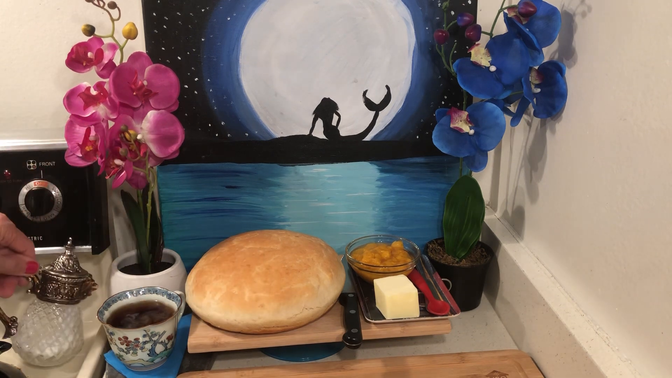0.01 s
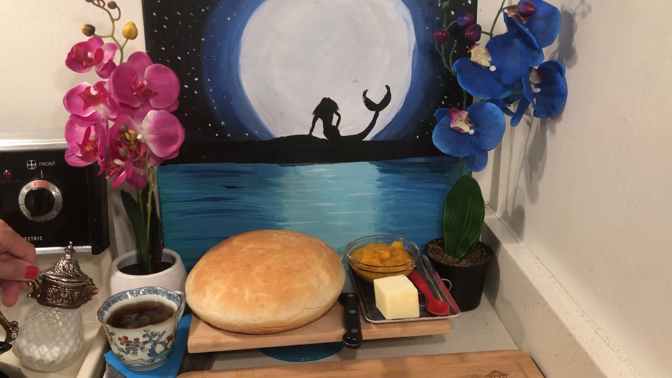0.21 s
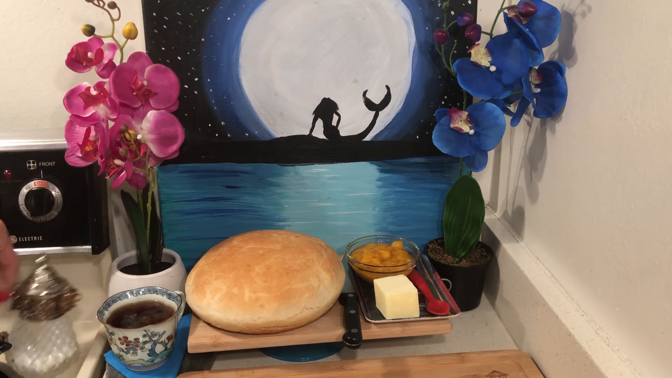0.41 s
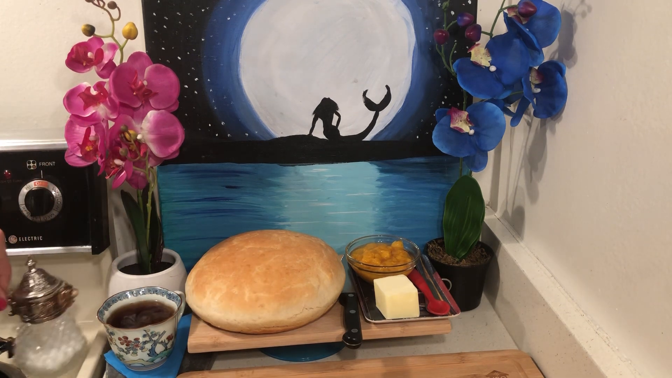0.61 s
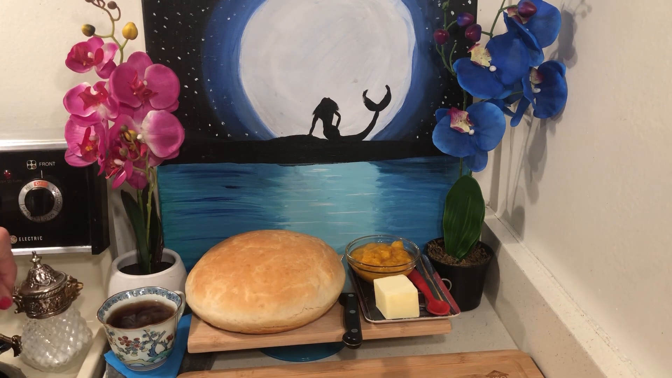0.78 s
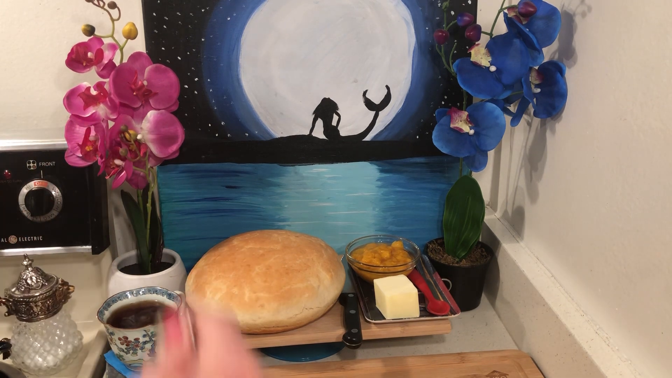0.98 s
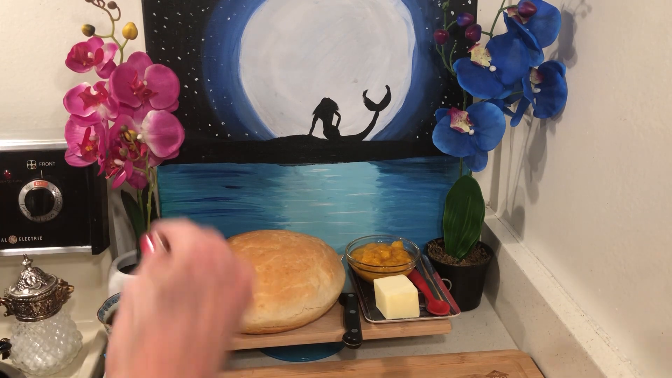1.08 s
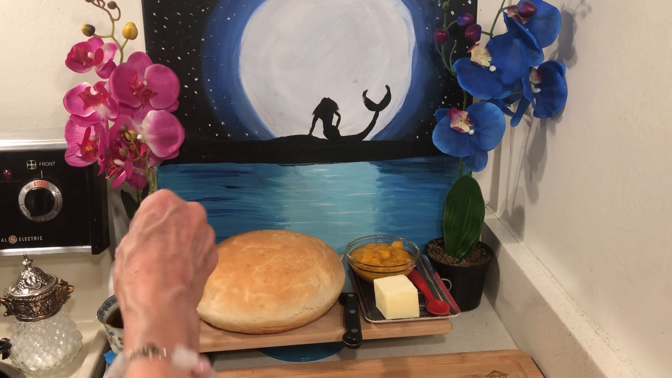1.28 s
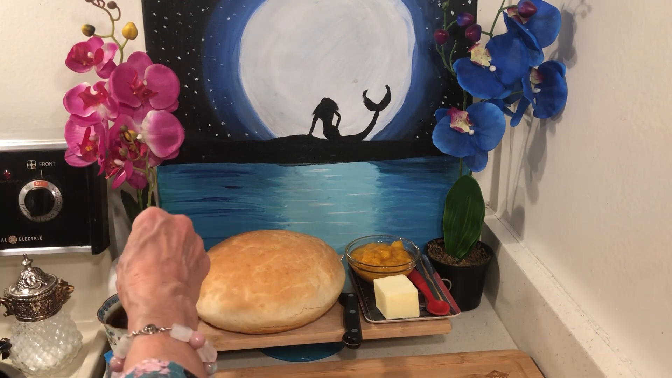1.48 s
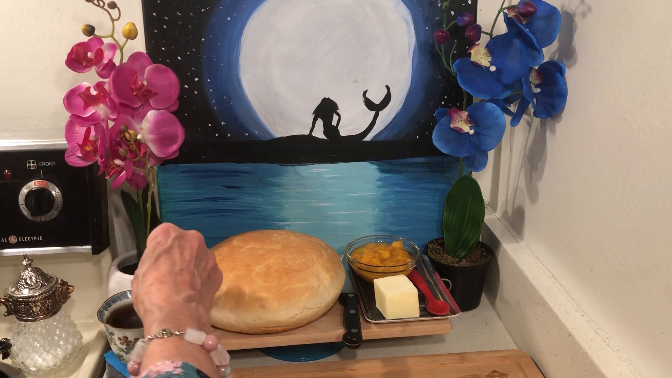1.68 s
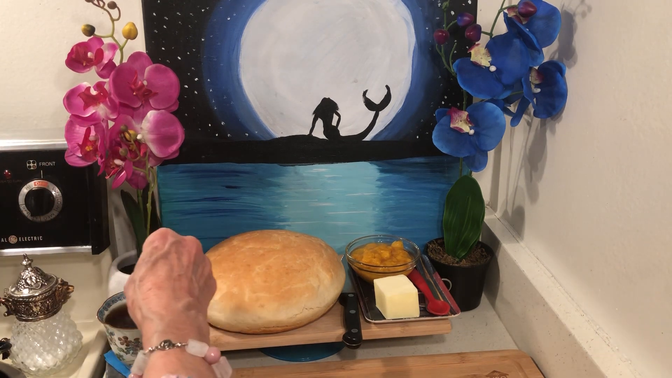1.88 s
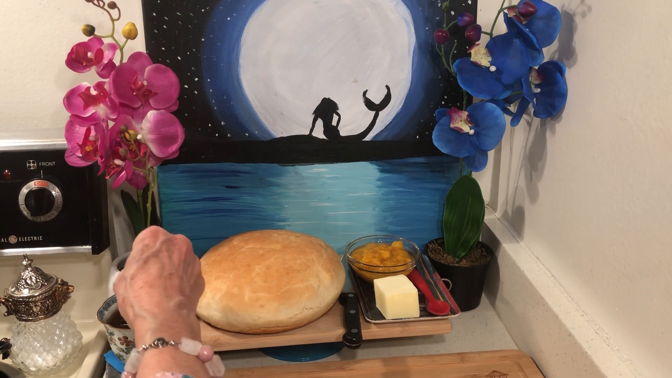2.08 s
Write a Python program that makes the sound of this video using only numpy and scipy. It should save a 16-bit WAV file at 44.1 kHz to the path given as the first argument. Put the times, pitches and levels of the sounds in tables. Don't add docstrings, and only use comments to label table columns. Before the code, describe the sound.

A small metal pot with a glass belly is set on a hard counter with sharp knocks, lid tink and rocking bounces, then a short drag; later a cup tap and faint bead jingle, close microphone, humming kitchen.

```python
import sys
import numpy as np
from scipy import signal
from scipy.io import wavfile
from scipy.ndimage import uniform_filter1d

SR = 44100
rng = np.random.default_rng(int(sys.argv[2]) if len(sys.argv) > 2 else 0)


def log_audio(samples):
    frames = np.atleast_2d(samples).T
    limited = np.clip(frames, -1, 1)
    pcm = np.round(limited * 32767).astype(np.int16)
    wavfile.write(sys.argv[1], SR, pcm)


def voltage_ratio(decibels):
    exponent = np.asarray(decibels, float) / 20
    return 10 ** exponent


N = 92610


def evened(x):
    return x / np.sqrt(np.mean(x ** 2) + 1e-20)


def read(points, hz):
    f, value = np.transpose(points)
    return np.interp(np.log(hz + 1), np.log(f + 1), value)


def add(mix, start_s, sound):
    part = mix[max(round(start_s * SR), 0):][:len(sound)]
    part += sound[:len(part)]


def causal(points, size=512):
    hz = np.abs(np.fft.fftfreq(4 * size, 1 / SR))
    log_gain = read(points, hz) * np.log(10) / 20
    spectrum = np.exp(np.conj(signal.hilbert(log_gain)))
    taps = np.fft.ifft(spectrum).real[:size]
    return taps / np.linalg.norm(taps)


def ring(modes, gains_db=0, paired=False, size=6000):
    t = np.arange(size) / SR
    hz, db, t60_s = np.transpose(modes)[:, :, None]
    wave = np.sin(2 * np.pi * hz * t)
    if paired:
        pair_split, partner_db = 0.0118, -8
        wave = wave + voltage_ratio(partner_db) * np.sin(2 * np.pi * hz * (1 + pair_split) * t)
    decay_db = -60 * t / np.clip(t60_s, 0.01, 0.45)
    return (voltage_ratio(db + gains_db + decay_db) * wave).sum(0)


# frequency in Hz, level in dB per Hz.
AIR_COLOUR = [(25, -15), (50, -26), (80, 0.5), (300, -8), (800, -12), (2500, -23), (7000, -34),
              (16000, -46)]
AIR_DB, AIR_EDGE_HZ, PATCHY_DB = -53.5, 15850, 1.0


def air():
    frames, hz = N // 1024 + 5, np.fft.rfftfreq(4096, 1 / SR)
    a, b, patches = rng.standard_normal((frames, 2049, 3)).T
    patches = uniform_filter1d(patches, size=30, axis=0)
    patches = evened(uniform_filter1d(patches, size=3, axis=1))
    level_db = read(AIR_COLOUR, hz)[:, None] + PATCHY_DB * patches
    z = (a + 1j * b) * voltage_ratio(level_db) * (hz < AIR_EDGE_HZ)[:, None]
    return voltage_ratio(AIR_DB) * evened(signal.istft(z, nperseg=4096, noverlap=3072)[1][:N])


# frequency in Hz, width in Hz, level in dB.
HUM_LINES = [(68, 21, -68), (122.2, 5.3, -55.5), (156.2, 13.5, -65.5), (229.2, 2.5, -57), (279.3, 6.5, -63),
             (413, 4, -62.5), (452, 18, -66.5)]


def hum():
    step_s = 0.005
    t, coarse_s = np.arange(N) / SR, np.arange(-1, N / SR + 0.1, step_s)
    out = np.zeros(N)
    for hz, width_hz, db in HUM_LINES:
        r = np.exp(-np.pi * width_hz * step_s)
        u, v = rng.standard_normal((2, len(coarse_s)))
        slow = signal.lfilter([1], [1, -2 * r, r * r], u + 1j * v)
        slow = np.interp(t, coarse_s, 1.3 + slow / np.abs(slow).mean())
        out += voltage_ratio(db) * evened((slow * np.exp(2j * np.pi * hz * t)).real)
    return out


# frequency in Hz, t60 in seconds.
ROOM_DECAY = [(100, 0.79), (400, 0.4), (1500, 0.33), (4000, 0.34), (9000, 0.26), (15000, 0.21)]
PREDELAY_S = 0.004
EARLY_GAIN, EARLY_S = 1.44, 0.022


def room(x):
    taps = np.zeros(SR // 3)
    at = np.arange(400, SR // 3 - 20, 20)
    at = at + rng.integers(0, 20, len(at))
    taps[at] = rng.choice([-1., 1.], len(at))
    hz, t, z = signal.stft(taps, SR, nperseg=256)
    z = z * voltage_ratio(-60 * t / read(ROOM_DECAY, hz)[:, None])
    tail = signal.istft(z, SR, nperseg=256)[1][400:]
    tail = tail * (1 + EARLY_GAIN * np.exp(-np.arange(len(tail)) / SR / EARLY_S))
    delay = np.zeros(round(PREDELAY_S * SR))
    return signal.oaconvolve(x, np.r_[delay, tail / np.linalg.norm(tail)])[:N]


# start in seconds, level in dB, pitch in Hz.
BOOM_EVENTS = [
    (0.211, -43, 87.4),
    (0.586, -50.5, 77.3),
    (0.76, -49, 109),
    (1.669, -60, 68.5),
]
BOOM_RISE_S, BOOM_T60_S = 0.07, 0.3


def booms():
    out, t = np.zeros(N), np.arange(SR // 2) / SR
    shape = (1 - np.exp(-t / BOOM_RISE_S)) ** 2 * voltage_ratio(-60 * t / BOOM_T60_S)
    shape = shape / shape.max()
    for start_s, db, hz in BOOM_EVENTS:
        tone = np.sin(2 * np.pi * hz * t) + 0.81 * np.sin(2 * np.pi * hz * 0.763 * t + 0.9)
        add(out, start_s, voltage_ratio(db) * tone * shape)
    return out


# frequency in Hz, level in dB, t60 in seconds.
BEAD_MODES = [(5835, -32, 0.13), (7420, -13, .025), (8450, -7, 0.036), (10000, -3, 0.055), (11400, -1, .02),
              (12450, -4, .035), (13700, -4, .035), (15400, -12, .015)]
BEAD_SCATTER_DB, BEAD_DETUNE, RATTLE_S = 2.0, 0.015, 0.0022


def jingle(db):
    scatter, detune = rng.standard_normal((2, len(BEAD_MODES), 1))
    pitch = 1 + BEAD_DETUNE * detune * (db < -56)
    modes = np.array(BEAD_MODES) * np.c_[pitch, np.ones((len(BEAD_MODES), 2))]
    rattle = rng.standard_normal(300) * np.exp(-np.arange(300) / SR / RATTLE_S)
    tone = ring(modes, BEAD_SCATTER_DB * scatter, paired=True, size=3000)
    return voltage_ratio(db) * signal.fftconvolve(tone, rattle / np.linalg.norm(rattle))


# start in seconds, level in dB.
JINGLE_EVENTS = [(1.76, -69), (1.833, -69), (1.8595, -68), (1.891, -67), (1.901, -70), (1.942, -62),
                 (1.9565, -46), (2.035, -74), (2.053, -67), (2.063, -73), (2.091, -65)]


def bracelet():
    out = np.zeros(N)
    for start_s, db in JINGLE_EVENTS:
        add(out, start_s, jingle(db))
    return out


CUP_MODE_HZ = [1416, 2950, 3346, 3353, 5211, 6030, 6821, 7413, 8250, 9900, 10300, 11500, 12400, 14560]
# level in dB, t60 in seconds.
CUP_MODES = [(-13.5, 0.45), (-5, .04), (-4.5, 0.15), (-3.5, 0.24), (-8, .28), (-10.5, 0.16), (-11.5, 0.1),
             (-7, 0.047), (-5.5, .12), (-2, 0.017), (-12, .08), (-6, 0.054), (-14, .05), (-13, .07)]
# start in seconds, level in dB.
CUP_EVENTS = [
    (1.718, -40.5),
    (1.946, -67.5),
]


def cup():
    out = np.zeros(N)
    for start_s, db in CUP_EVENTS:
        add(out, start_s, voltage_ratio(db) * ring(np.c_[CUP_MODE_HZ, CUP_MODES], paired=True, size=12000))
    return out


# frequency in Hz, level in dB, t60 in seconds.
LID_MODES = [(4470, -5.5, 0.041), (5890, -4, 0.13), (6170, -1, 0.085), (8170, -7, 0.13), (8300, -18, .05),
             (9400, -12, .08), (10800, -13, .06), (13200, -23, .05)]
# start in seconds, level in dB.
LID_EVENTS = [
    (0.085, -54),
    (0.204, -36),
]


def lid():
    out = np.zeros(N)
    for start_s, db in LID_EVENTS:
        add(out, start_s, voltage_ratio(db) * ring(LID_MODES, paired=True))
    return out


# frequency in Hz, level in dB.
CONTACT_COLOUR = [(100, -8), (300, 1.5), (700, 4.5), (2000, 0.5), (4500, -5), (9000, -7.5), (16000, -17.5)]
FAVOUR_LIFT_DB, FAVOUR_WIDTH_OCT, SOFT_HZ = 2.5, 0.46, 3030


def crack(dull_db_per_oct, favoured_hz):
    hz = np.geomspace(100, 16000, num=24)
    lift_db = FAVOUR_LIFT_DB * np.exp(-(np.log2(hz / favoured_hz) / FAVOUR_WIDTH_OCT) ** 2)
    dull_db = dull_db_per_oct * np.log2(1 + (hz / SOFT_HZ) ** 2) / 2
    return causal(np.c_[hz, read(CONTACT_COLOUR, hz) + lift_db + dull_db])


# frequency in Hz, level in dB, t60 in seconds.
COUNTER_MODES = [(168.6, -3.5, 0.07), (294.3, -6, 0.18), (381, -5.5, 0.046), (585, 2, 0.034),
                 (700, -2, 0.094), (1030, -10.5, 0.041), (1175, 0.5, 0.013), (1485, 0.5, 0.037),
                 (1680, -12.5, 0.039), (1950, -10, 0.01), (2270, -5, 0.01), (2877, -11.5, 0.017),
                 (3200, -2.5, 0.014)]
FAVOUR_DB_PER_OCT = -6.0


def counter(favoured_hz):
    away_oct = np.abs(np.log2(np.transpose(COUNTER_MODES)[0] / favoured_hz))[:, None]
    scatter_db = 0.5 * rng.standard_normal(away_oct.shape)
    body = ring(COUNTER_MODES, FAVOUR_DB_PER_OCT * away_oct + scatter_db, size=2400)
    return body / np.linalg.norm(body)


GRIT_PER_S, GRIT_SPREAD_DB = 2300, 3.0
DRAG_DULL_DB_PER_OCT, DRAG_HZ, DRAG_RING_DB = -20, 900, 4


def drag(curve):
    start_s, db = np.transpose(curve)
    size = SR // 4
    t = start_s[0] + np.arange(size) / SR
    clicks = rng.random(size) < GRIT_PER_S / SR
    click_db = rng.exponential(1, size) * GRIT_SPREAD_DB
    grit = evened(clicks * voltage_ratio(click_db) * rng.choice([-1., 1.], size))
    body = voltage_ratio(DRAG_RING_DB) * counter(DRAG_HZ)
    add(body, 0, crack(DRAG_DULL_DB_PER_OCT, DRAG_HZ))
    return signal.fftconvolve(grit * voltage_ratio(np.interp(t, start_s, db, right=-120)), body)


# time in seconds, level in dB.
DRAG_CURVES = [
    [(0.50, -77), (0.535, -62), (0.562, -64), (0.57, -73)],
    [(0.85, -62), (0.885, -57), (0.92, -46), (0.97, -53), (1.005, -62.5), (1.02, -68)],
]


def drags(tracks):
    for track, curve in zip(tracks, DRAG_CURVES):
        add(track, curve[0][0], drag(curve))


CLICKS_PER_S, SEAT_S, FIRST_CLICK = 9000, 0.005, 0.26
RING_DB, BLOW_S, BOUNCE_S, BOUNCE_GAIN = -6, 0.002518, 0.0052, 0.51


def knock(db, dull_db_per_oct, favoured_hz, chatter_s):
    t = np.arange(4000) / SR
    chance, size = rng.random((2, 4000))
    shape = (FIRST_CLICK + 1 - np.exp(-t / SEAT_S)) * np.exp(-t / max(chatter_s, 0.0005))
    clicks = (chance < CLICKS_PER_S / SR) * (2 * size - 1) * shape
    crackle = signal.fftconvolve(clicks, crack(dull_db_per_oct, favoured_hz))[:4000]
    sound = crackle / np.linalg.norm(crackle)
    body = voltage_ratio(RING_DB) * counter(favoured_hz)
    add(sound, BLOW_S, body)
    add(sound, BLOW_S + BOUNCE_S, BOUNCE_GAIN * body)
    return voltage_ratio(db) * sound / np.sqrt(np.mean(sound[:400] ** 2))


# start in seconds, level in dB, dullness in dB per octave,
# favoured ring in Hz, chatter in seconds.
KNOCK_EVENTS = [(0.002, -35.5, -14.5, 700, 0.0045), (0.2005, -22.5, 0, 337, 0.0041),
                (0.203, -23, -2, 2160, 0.0034), (0.562, -34, 1, 2900, 0.0025),
                (0.577, -23, -1.5, 1000, 0.0045), (0.668, -35.5, -6, 1190, 0.0037),
                (0.682, -31.5, -8.5, 700, 0.0044), (0.739, -37.5, -4, 1170, .004),
                (0.7515, -31.5, -11, 3200, 0.0057), (0.756, -26.5, -7, 1390, 0.0028),
                (0.862, -40, -11, 1175, 0.0027), (0.911, -42, -10.5, 900, 0.0055),
                (0.952, -47, -8, 1200, 0.001), (1.6605, -44.5, -11, 2200, 0.0085),
                (1.718, -46, 8.5, 9500, .004), (2.095, -52, -6, 2600, 0.0037)]


def knocks(tracks):
    for k, (start_s, *contact) in enumerate(KNOCK_EVENTS):
        add(tracks[k % len(tracks)], start_s, knock(*contact))


def scene():
    low_cut_hz, hit_room_db, ring_room_db = 110, -1, -8
    hits = np.zeros((3, N))
    knocks(hits)
    drags(hits)
    hits = signal.lfilter(*signal.butter(2, low_cut_hz, "high", fs=SR), hits)
    rings = lid() + cup() + bracelet()
    hit_echoes = voltage_ratio(hit_room_db) * sum(room(hit) for hit in hits)
    ring_echoes = voltage_ratio(ring_room_db) * room(rings)
    mix = hits.sum(0) + rings + booms() + hit_echoes + ring_echoes + air() + hum()
    return mix[None]


def roll_off(x):
    return signal.sosfilt(signal.butter(12, 16770, fs=SR, output="sos"), x)


def record(dry):
    edge_hz = 16450
    low_pass = signal.firwin(511, edge_hz, window=("kaiser", 9), fs=SR)
    mix = signal.oaconvolve(dry, low_pass[None], "same")
    return roll_off(mix)


dry = scene()
out = record(dry)
log_audio(out)
```